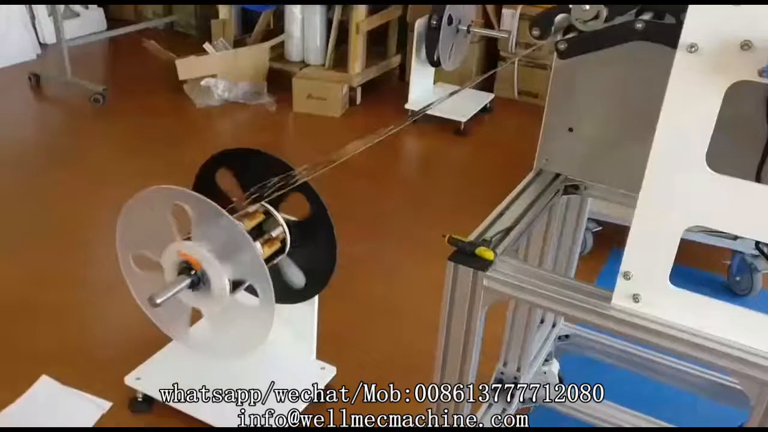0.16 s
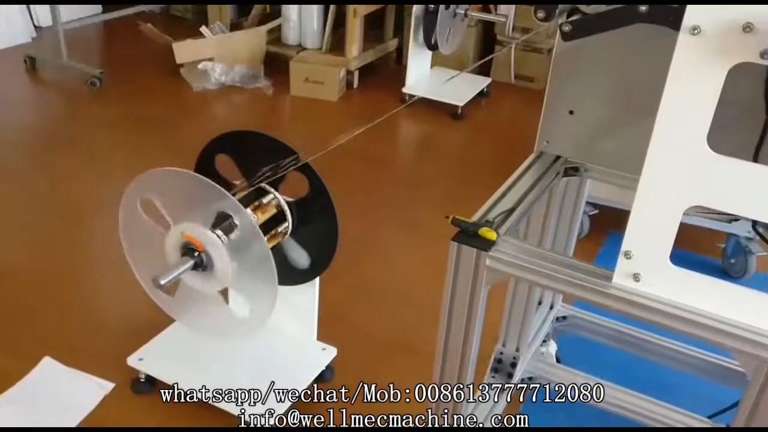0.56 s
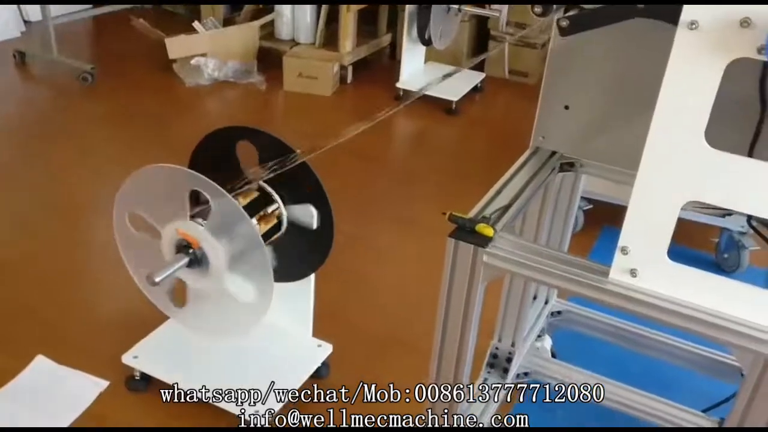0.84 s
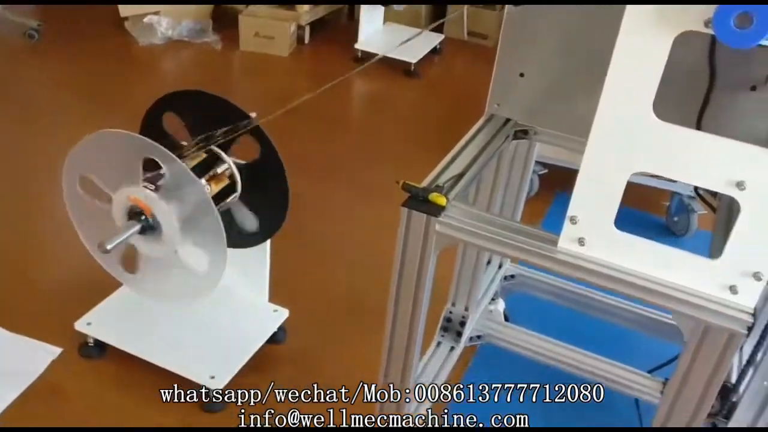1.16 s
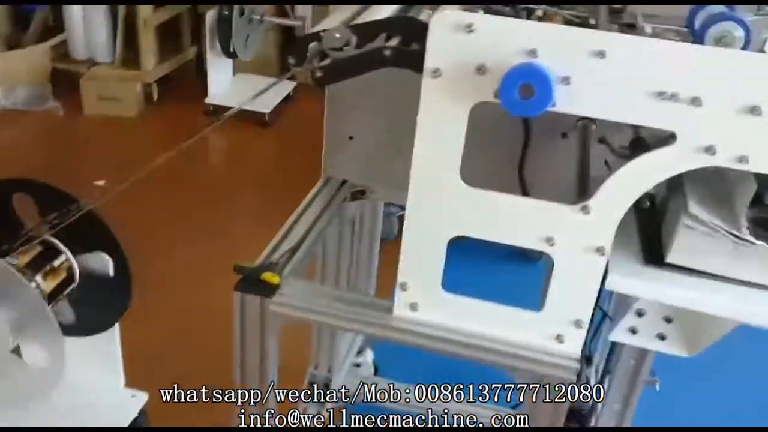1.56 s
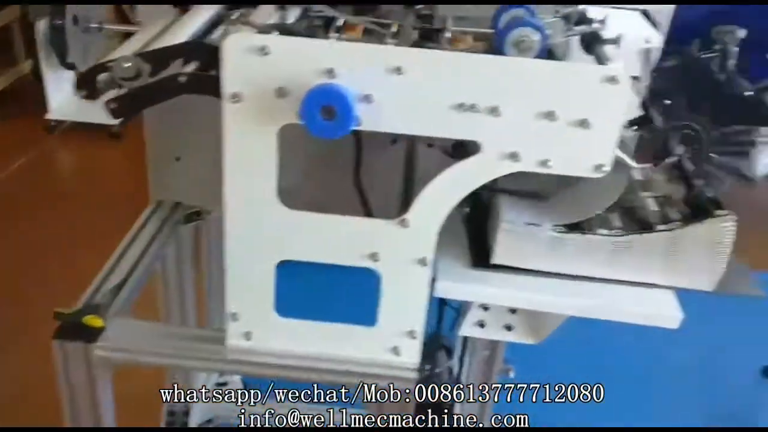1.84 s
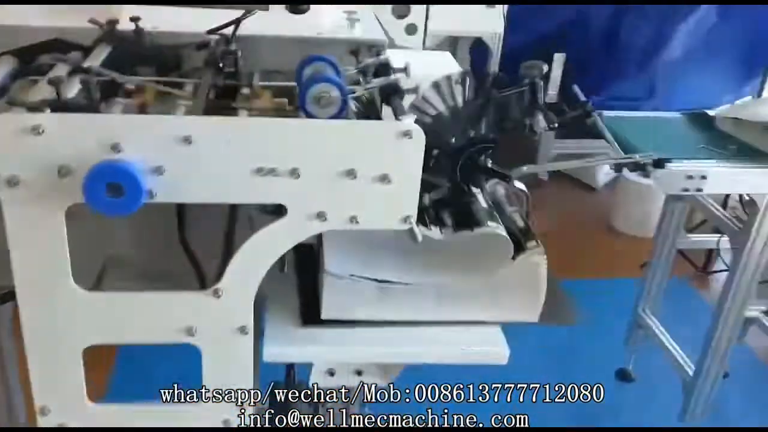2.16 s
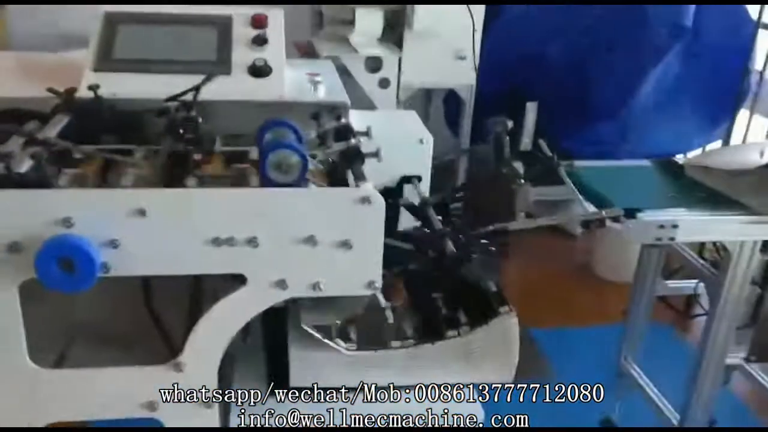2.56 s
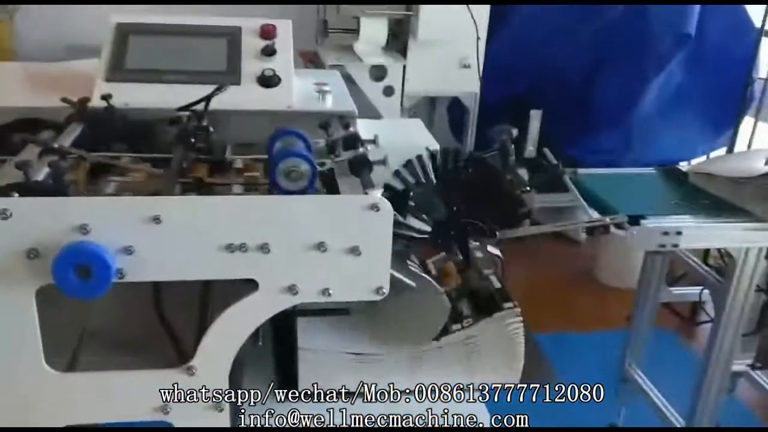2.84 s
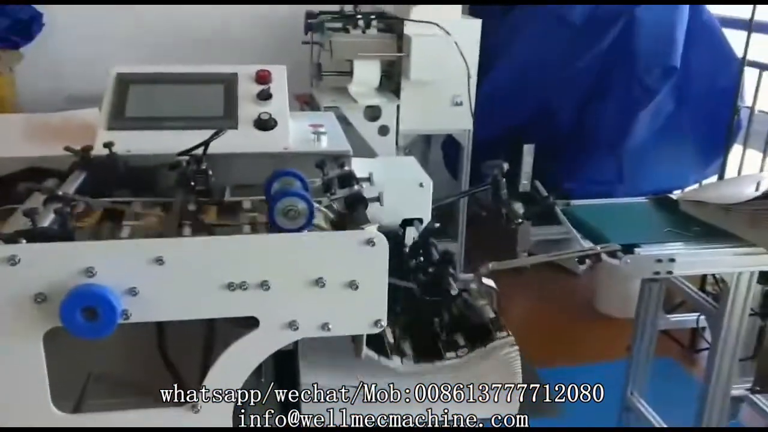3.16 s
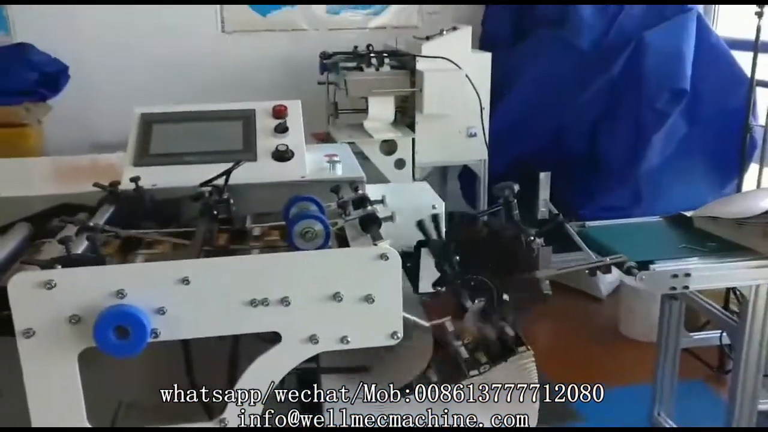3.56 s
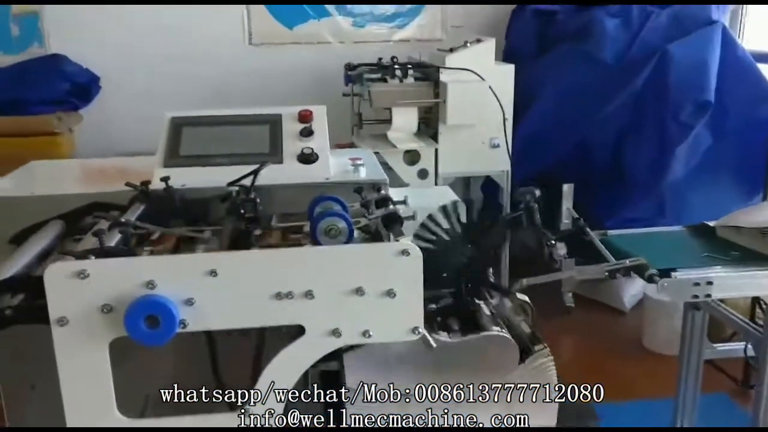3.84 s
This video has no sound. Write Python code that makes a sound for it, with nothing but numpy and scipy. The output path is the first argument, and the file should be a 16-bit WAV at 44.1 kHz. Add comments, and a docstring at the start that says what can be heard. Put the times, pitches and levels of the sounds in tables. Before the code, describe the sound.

A paper folding machine whirs and knocks rapidly in a workshop, fading in quickly; a sharp metal clack with a spit of air comes about every 0.85 seconds, each followed by a softer thump, heard close by a moving microphone.

```python
"""In a workshop, the microphone is carried past a paper folding machine; the sound fades in at the start.
The folding shaft knocks the same pattern every turn, over humming motor, whining gears and noisy rollers.
About every eight turns a separator arm clacks out, its metal modes ringing with a noisy spit of air.
It thumps back just over a quarter second later; small latches tick as brief noise and a ring.
Paper hiss swells and sinks with that cycle, as broad noise."""
import sys
import numpy as np
from scipy import signal
from scipy.fft import rfft, irfft
from scipy.io import wavfile
from scipy.ndimage import uniform_filter1d

SR = 44100
rng = np.random.default_rng(int(sys.argv[2]) if len(sys.argv) > 2 else 0)


def wrap_up_sound(samples):
    """Save the sound to the file named by the first command line argument, as 16-bit audio."""
    columns = np.atleast_2d(samples).T
    # keep every value between -1 and 1, then stretch to whole-number steps
    tamed = np.clip(columns, -1, 1)
    steps = np.round(tamed * 32767).astype(np.int16)
    wavfile.write(sys.argv[1], SR, steps)


N = 176400
TIME = np.arange(N) / SR  # s
SHORT = 12000  # samples in one short sound

# separator clacks: t/s, strike level/dB, air spit level/dB, rattle level/dB, body f/Hz, body level/dB
SEPARATOR_CLACKS = [(0.5798, -25, -22.5, -37, 1965, -28.5), (1.4436, -24, -25, -31, 997, -27),
                    (2.2886, -11.5, -22.5, -28, 1948, -22.5), (3.1212, -17, -24, -32, 2214, -23.5),
                    (3.967, -17, -21.5, -32.5, 2280, -30)]
# spectrum of sliding or slapped paper: f/Hz, relative level/dB
PAPER_SPECTRUM = [(500, -43), (2000, -2.5), (4000, 4), (5500, 1), (7200, -5.5), (9800, 2), (13800, 1.5),
                  (16000, -6)]
# spectrum of small metal clicks: f/Hz, relative level/dB
CLICK_SPECTRUM = [(200, -6), (900, -4.5), (1800, 4), (4000, -4), (6500, -7), (14000, -40)]


def amp(db):
    """Decibels to gain."""
    return 10 ** (np.asarray(db) / 20)


def unit(x):
    """Scales to rms 1."""
    return x / np.sqrt(np.mean(x ** 2) + 1e-20)


def read(points, hz):
    """Reads a table on a log-frequency axis."""
    f, value = np.transpose(points)
    return np.interp(np.log(hz + 1), np.log(f + 1), value)


def over_time(points):
    """Draws straight lines between (time, value) points."""
    return np.interp(TIME, *np.transpose(points))


def colour(x, spectrum):
    """Filters a signal by a spectrum and sets it to rms 1."""
    gain = amp(read(spectrum, np.fft.rfftfreq(len(x), 1 / SR)))
    return unit(irfft(rfft(x) * gain, len(x)))


def add(mix, s, sound):
    """Mixes a sound in at a time in seconds."""
    part = mix[max(round(s * SR), 0):][:len(sound)]
    part += sound[:len(part)]


def wander(rate_hz):
    """Slow random drift of rms 1: noise low-passed near rate_hz."""
    t = TIME[::SR // 450]  # a coarse time grid is enough
    hz = np.fft.rfftfreq(len(t), t[1])
    noise = rfft(rng.standard_normal(len(t)))
    slow = irfft(noise / (1 + (hz / rate_hz) ** 4), len(t))
    return np.interp(TIME, t, unit(slow))


def envelope(rise_s, t60):
    """A straight rise, then an exponential fall of 60 dB in t60 seconds."""
    t = TIME[:SHORT]
    fall = np.exp(-np.log(1000) * np.maximum(t - rise_s, 0) / t60)
    return np.minimum(t / rise_s, 1) * fall


def burst(spectrum, rise_s, t60):
    """Many close modes dying together, as coloured noise."""
    return colour(rng.standard_normal(SHORT), spectrum) * envelope(rise_s, t60)


def ring(hz, rise_s, t60):
    """One dying mode, as a sine."""
    return np.sin(2 * np.pi * hz * TIME[:SHORT]) * envelope(rise_s, t60)


def taps(per_s, spread_db, sound):
    """One short sound set off at random moments, with uneven strength and random polarity."""
    out = np.zeros(N)
    for when, size, sign in rng.random((round(per_s * N / SR), 3)):
        strength = np.sign(sign - .5) * amp(spread_db * size)
        add(out, when * N / SR, strength * sound)
    return out


def uneven_noise(spectrum, uneven_db):
    """Broad noise with random level changes across time and frequency."""
    z = signal.stft(rng.standard_normal(N), nperseg=512, noverlap=384)[2]
    levels = uniform_filter1d(rng.standard_normal(z.shape), 14, 1)  # smooth along time
    levels = unit(uniform_filter1d(levels, 4, 0))  # then along frequency
    noise = signal.istft(z * amp(uneven_db * levels), nperseg=512, noverlap=384)[1][:N]
    return colour(noise, spectrum)


def shaft(turn_hz=9.432, knock_db=-37, vary_db=0.64, jitter_s=0.00068, fresh=0.67):
    """Each turn repeats the same knocks and pushes on the frame, never quite alike."""
    # knocks within one turn: t/s, level/dB relative to knock_db
    turn_knocks = [(.021, -7), (.043, 1), (.073, -5.5), (.101, -13.5)]
    # frame resonances pushed once a turn: t/s, f/Hz, level/dB, t60/s
    frame_modes = [(0.03397, 100, -49.5, 0.09), (.027, 242.3, -41.5, 0.078), (.083, 252, -37, 0.015),
                   (.052, 392, -42.5, 0.091), (0.068, 290, -43.5, 0.058), (.048, 257, -45, 0.062),
                   (.02, 650, -45.5, 0.076), (.042, 565, -38.5, 0.066)]
    # knock spectrum: f/Hz, relative level/dB
    knock_spectrum = [(60, -9.5), (170, 2.5), (250, 0.5), (450, -2.5), (620, 6), (900, -2.5), (2000, 0.5),
                      (4000, -27), (7000, -9.5), (14000, -34)]
    out = np.zeros(N)
    repeated = [burst(knock_spectrum, 0.0015, 0.05) for _ in turn_knocks]
    for turn_s in np.arange(0, N / SR, 1 / turn_hz):
        for (s, db), same in zip(turn_knocks, repeated):
            knock = np.sqrt(1 - fresh ** 2) * same + fresh * burst(knock_spectrum, 0.00055, 0.068)
            add(out, turn_s + s, amp(knock_db + db + vary_db * rng.normal()) * knock)
        for s, hz, db, t60 in frame_modes:
            level = amp(db + vary_db * rng.normal())
            add(out, turn_s + s + jitter_s * rng.normal(), level * ring(hz, 0.0039, t60))
    return out


def drive(flutter_db=2.5, waver_hz=7, gear_waver_hz=5.52, gear_flutter_db=1.5):
    """Rough low tones of the motor and the gliding whine of the gears, as wavering sines."""
    # low motor tones: f/Hz, level/dB
    motor_tones = [(48.4, -63.5), (122.6, -61.5), (236, -57.5), (284, -56)]
    # gear whine, steady at first, then sagging and climbing: t/s, f/Hz, level/dB
    gear_whine = [(.3, 676, -56), (.58, 679, -51.5), (.85, 673.6, -52.5), (1.42, 676.4, -51),
                  (1.55, 658, -49.5), (1.701, 682, -49.5), (2.0, 648, -56.5), (2.29, 693, -50),
                  (2.35, 639, -56), (2.67, 690, -52), (2.95, 653, -56), (3.1, 681, -48.5), (3.24, 705, -54),
                  (3.32, 668, -57), (3.75, 678, -56.5), (3.95, 680, -49.5)]

    def tone(hz, db):
        return amp(db) * np.sqrt(2) * np.sin(2 * np.pi * np.cumsum(hz) / SR)

    out = np.zeros(N)
    top_hz = motor_tones[-1][0]
    for hz, db in motor_tones:
        waver = waver_hz * hz / top_hz * wander(13.8)  # in proportion to the pitch
        out += tone(hz + waver, db + flutter_db * wander(7.6))
    s, whine_hz, whine_db = np.transpose(gear_whine)
    gear_hz = np.interp(TIME, s, whine_hz) + gear_waver_hz * wander(18.7)
    gear_db = np.interp(TIME, s, whine_db) + gear_flutter_db * wander(11)
    return out + tone(gear_hz, gear_db)


def cycle_db(outer_cycle_s=0.84):
    """Hiss and whir levels in dB, following the separator from clack to clack."""
    # one separator cycle: share of the cycle, paper hiss level/dB, whir level/dB
    cycle_levels = [(0, 0, -2), (.075, 2.5, 0), (.11, -2.5, -1), (.18, -2.5, -0.5), (.215, 0.5, -1),
                    (.27, 2, -2.5), (.335, 5, -1), (.39, 2, -2.4), (.48, 3, -0.5), (.6, -0.7, -1.5),
                    (.7, -8, -3), (.8, 0.3, -3), (.83, -1.5, -1), (.87, 1, 0), (.93, -4.5, -1.5),
                    (1, -1.5, -0.5)]
    starts = [row[0] for row in SEPARATOR_CLACKS]
    marks = [starts[0] - outer_cycle_s] + starts + [starts[-1] + outer_cycle_s]
    share = np.interp(TIME, marks, np.arange(len(marks))) % 1
    at, hiss, whir = np.transpose(cycle_levels)
    return np.interp(share, at, hiss), np.interp(share, at, whir)


def jingle(level_db=-41.0, t60=0.095, spread_db=11, count=80):
    """Dozens of small metal parts, each shaken at random and ringing at its own pitch."""
    # jingle spectrum: f/Hz, relative level/dB
    jingle_spectrum = [(300, -22), (700, -10), (1200, -3), (2000, -2), (2900, -2), (4000, -3), (5200, -3.5),
                       (6200, -12), (8000, -24), (14000, -24)]
    pitches = np.linspace(750, 6000, count) * rng.uniform(.97, 1.03, count)  # Hz
    parts = sum(taps(14, spread_db, ring(hz, 0.00077, t60)[:SR // 16]) for hz in pitches)
    return amp(level_db) * colour(parts, jingle_spectrum)


def chatter(level_db=-47.5, t60=0.064, spread_db=7, count=8):
    """Loose linkages click against each other, giving the whir a coarse grain."""
    clicks = sum(taps(10, spread_db, burst(CLICK_SPECTRUM, 0.0011, t60)[:SR // 20])
                 for _ in range(count))
    return amp(level_db) * unit(clicks)


def crinkle(level_db=-43, t60=0.0067, spread_db=11, count=14):
    """Tiny snaps of paper creasing over the folding plates, each kind its own noise burst."""
    # crinkle spectrum: f/Hz, relative level/dB
    crinkle_spectrum = [(400, -18), (1200, -0.5), (2200, 1), (4200, -0.5), (5500, -6), (7000, -22.5),
                        (14000, -26)]
    snaps = sum(taps(13, spread_db, unit(burst(crinkle_spectrum, 0.00033, t60)[:SR // 50]))
                for _ in range(count))
    return amp(level_db) * unit(snaps)


def rollers(whir_db=-40.0, hiss_db=-41.0, uneven_db=3.0):
    """Rollers and gears whir, jingle and chatter while paper slides and crinkles through them."""
    # whir spectrum: f/Hz, relative level/dB
    whir_spectrum = [(25, -37), (55, -6), (130, -3), (175, -4), (245, 3.5), (340, -3.5), (460, -6.5),
                     (570, 0), (660, 2.5), (850, -10.5), (1250, -4.5), (2000, 0), (2900, -1.5), (4000, -3),
                     (5200, -8), (6500, -12.5), (8000, -18.5), (14000, -22)]
    # mechanism level as the microphone is carried past: t/s, level/dB
    mechanism_near = [(.4, -.5), (1.2, 0), (2.1, 0), (3, -1), (4, -1)]
    # hiss level, growing as the microphone nears the folding head, then easing: t/s, level/dB
    paper_near = [(.4, -1.5), (2.1, 0), (2.5, 0.5), (3.4, 0), (4, -.5)]
    hiss_cycle, whir_cycle = cycle_db()
    whir = uneven_noise(whir_spectrum, uneven_db) * amp(whir_db + 0.37 * wander(30))
    mechanism = whir + jingle() + chatter() + crinkle()
    hiss_level = hiss_db + hiss_cycle + over_time(paper_near) + 0.37 * wander(42)
    hiss = uneven_noise(PAPER_SPECTRUM, uneven_db) * amp(hiss_level)
    return mechanism * amp(whir_cycle + over_time(mechanism_near)) + hiss


def latches(ring_db=-1, ring_t60=0.047):
    """Latches tick, each a noise burst with a short ring of its own."""
    # small latch ticks: t/s, level/dB, ring f/Hz
    latch_ticks = [(.47, -35, 3750), (.78, -37, 2000), (1.105, -43, 2073), (1.317, -34, 1370),
                   (1.422, -33, 1480), (1.464, -31, 2600), (1.523, -34.5, 1610), (1.608, -34, 2140),
                   (1.8149, -29, 2210), (1.842, -36, 1830), (1.9102, -31, 4130), (2.1685, -34, 1580),
                   (2.458, -32, 1963), (2.634, -35, 2720), (2.6613, -32, 2380), (2.7572, -30, 1780),
                   (3.162, -36, 2300), (3.515, -33, 2050), (3.6029, -28.5, 3610), (3.8579, -38, 2580)]
    out = np.zeros(N)
    for s, db, hz in latch_ticks:
        tick = burst(CLICK_SPECTRUM, 0.0016, 0.026) + amp(ring_db) * ring(hz, 0.00038, ring_t60)
        add(out, s, amp(db) * tick)
    return out


def separator(bounce_s=.0085, bounce_db=-12, whistle_hz=13450, whistle_db=2, boom_db=-43,
              body_t60=0.039, pair=1.09, pair_db=-4):
    """The arm strikes its stop with a whistling spit of air; two close body modes beat under the rattle."""
    # arm modes: nominal f/Hz, level/dB relative to the strike, t60/s, delay/s
    arm_modes = [(1066, -12, 0.017, 0.006), (1730, -10, 0.006, 0.004), (2060, -8, 0.019, 0.00018),
                 (2630, -10, 0.018, 0.0049), (3140, -16.5, 0.012, .0003), (3760, -9, 0.014, 0.0016),
                 (4290, -8, 0.0077, 0), (4860, -10.5, 0.0072, .0002), (5620, -12.5, 0.0082, 0.00091)]
    # air spit spectrum: f/Hz, relative level/dB
    spit_spectrum = [(1000, -7.5), (4000, -2), (5500, -3.5), (7200, -9.5), (9000, -8), (12300, -6),
                     (13300, -13), (14200, -1.5)]
    # rattle spectrum: f/Hz, relative level/dB
    rattle_spectrum = [(40, -26), (110, -15), (250, -25), (520, -7), (850, 2.5), (1400, -0.5), (2000, 2.5),
                       (3200, -16), (5500, -6), (7500, -17), (14000, -13)]
    # frame boom spectrum: f/Hz, relative level/dB
    boom_spectrum = [(30, -33), (75, -2), (115, 4), (170, -17), (400, -35), (2000, -60)]
    out = np.zeros(N)
    for s, strike_db, spit_db, rattle_db, body_hz, body_db in SEPARATOR_CLACKS:
        for hz, db, t60, delay in arm_modes:
            mode = ring(hz * rng.uniform(0.93, 1.03), 0.0011, t60) * rng.choice([-1, 1])
            mode = amp(strike_db + db) * mode
            add(out, s + delay, mode)
            add(out, s + delay + bounce_s, amp(bounce_db) * mode)
        body = ring(body_hz, 0.001, body_t60)
        body += amp(pair_db) * ring(body_hz / pair, .002, body_t60)
        add(out, s + .001, amp(body_db) * body)
        add(out, s - .002, amp(spit_db) * burst(spit_spectrum, 0.0036, 0.029))
        add(out, s - .001, amp(spit_db + whistle_db) * ring(whistle_hz, 0.0012, 0.0084))
        add(out, s, amp(rattle_db) * burst(rattle_spectrum, 0.0026, .17))
        add(out, s, amp(boom_db) * burst(boom_spectrum, 0.045, 0.09))
    return out


def thumps(thud_hz=252, thud_delay_s=0.0082, contact_t60=0.034, tail_db=-5):
    """The arm drops back in a few quick contacts, slaps the paper and shakes the frame."""
    # returns: t/s, clatter level/dB, thud level/dB, knock f/Hz, knock level/dB, paper slap level/dB
    arm_returns = [(.868, -30.5, -28, 642, -34, -27), (1.714, -29, -31, 759, -32, -35),
                   (2.566, -29, -28.5, 600, -34.5, -28), (3.409, -27, -29.5, 691, -33.5, -33)]
    # contacts of one landing: t/s after the first, level/dB relative to the clatter
    landing_contacts = [(0, -4), (.0055, -0.5), (.024, -3)]
    # clatter spectrum: f/Hz, relative level/dB
    clatter_spectrum = [(80, -25), (300, -11), (700, 3.5), (1100, 2.5), (1800, 7.5), (3800, -3),
                        (7000, -7.5), (13500, -15)]
    out = np.zeros(N)
    for s, clatter_db, thud_db, knock_hz, knock_db, slap_db in arm_returns:
        for delay, db in landing_contacts:
            add(out, s + delay, amp(clatter_db + db) * burst(clatter_spectrum, 0.00096, contact_t60))
        add(out, s, amp(clatter_db + tail_db) * burst(clatter_spectrum, 0.0067, 0.17))
        add(out, s - .002, amp(slap_db) * burst(PAPER_SPECTRUM, 0.0019, 0.025))
        add(out, s, amp(knock_db) * ring(knock_hz, 0.0064, 0.081))
        add(out, s + thud_delay_s, amp(thud_db) * ring(thud_hz, 0.0032, 0.048))
    return out


def workshop(x, wet_db=-10):
    """Adds the room's diffuse echo: half a second of noise, each band dying at its own rate."""
    # reverberation of the workshop: f/Hz, t60/s
    room_t60 = [(100, 0.44), (1000, 0.71), (4000, 0.17), (14000, 0.11)]
    hz, t, z = signal.stft(rng.standard_normal(SR // 2), SR, nperseg=256)
    decay = amp(-60 * t / read(room_t60, hz)[:, None])
    tail = signal.istft(z * decay, SR, nperseg=256)[1]
    tail = tail * np.minimum(TIME[:len(tail)] / 0.0086, 1)  # the echo builds up over 8.6 ms
    return x + amp(wet_db) * signal.fftconvolve(x, tail / np.linalg.norm(tail))[:N]


def scene():
    """The machine, nearly mono, with a faint stereo spread from reflections."""
    # stereo spread: f/Hz, side level/dB relative to mid
    side_level = [(50, -27), (200, -33), (1500, -31), (2400, -31), (4300, -21.5), (8000, -22.5),
                  (14000, -24)]
    arm_and_latches = workshop(separator() + thumps() + latches())
    mid = arm_and_latches + shaft() + drive() + rollers()
    scatter = rng.standard_normal(SHORT) * envelope(.001, .03)
    phase = np.exp(1j * np.angle(rfft(scatter, N)))  # keeps only the phase of the reflections
    side_gain = amp(read(side_level, np.fft.rfftfreq(N, 1 / SR)))
    side = irfft(rfft(mid) * phase * side_gain, N)
    return np.array([mid + side, mid - side]) * amp([[-.15], [.15]])  # left, right balance in dB


def record(dry, gain_db=-.8, edge_hz=14150):
    """Input gain, fade-in and a steep low-pass at the band edge."""
    # fade-in: t/s, level/dB
    fade_in = [(.15, -66), (.175, -28), (.21, -11), (.26, -4), (.32, 2.5), (.37, 4.5)]
    faded = dry * amp(gain_db + over_time(fade_in))
    low_pass = signal.firwin(1023, edge_hz, window=("kaiser", 8), fs=SR)
    return signal.oaconvolve(faded, low_pass[None], "same")


dry = scene()
out = record(dry)
wrap_up_sound(out)
```